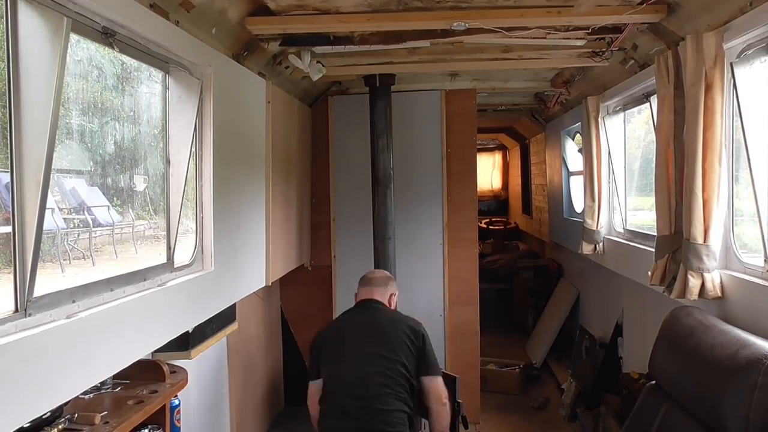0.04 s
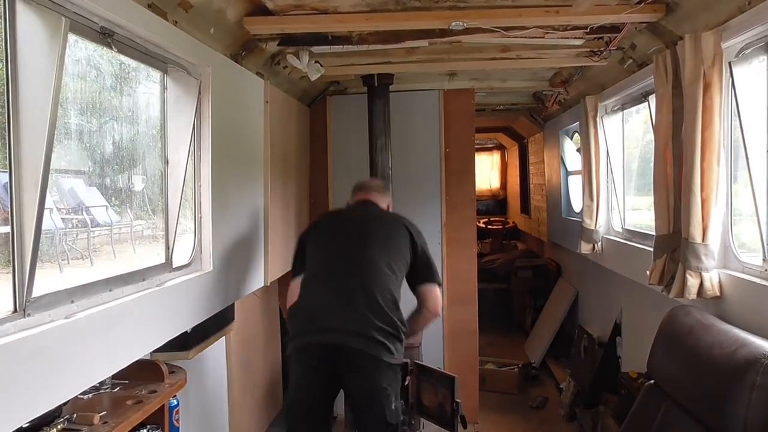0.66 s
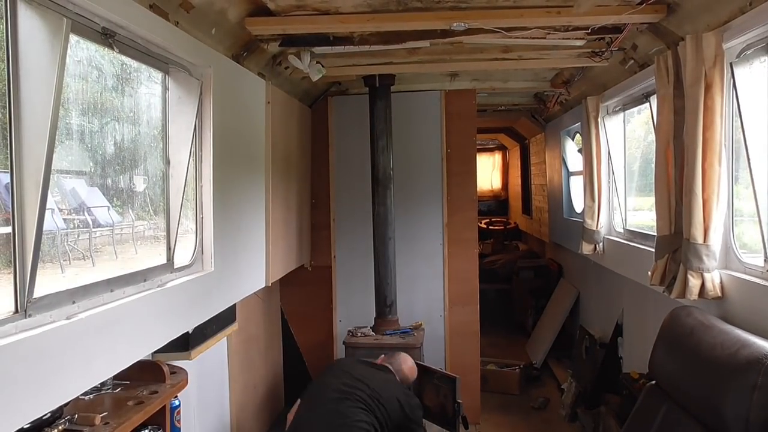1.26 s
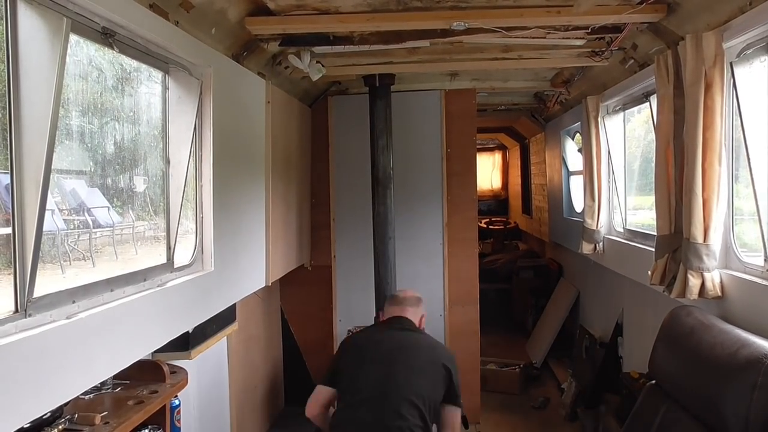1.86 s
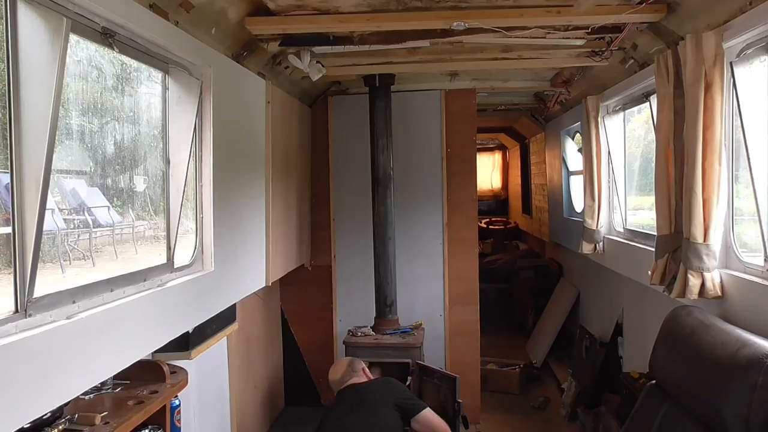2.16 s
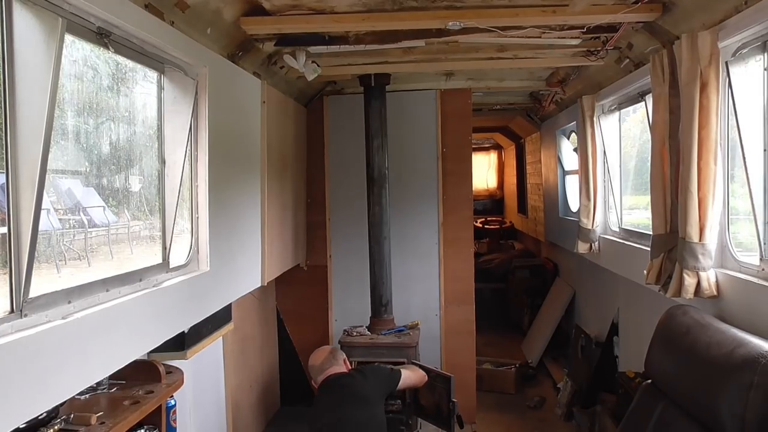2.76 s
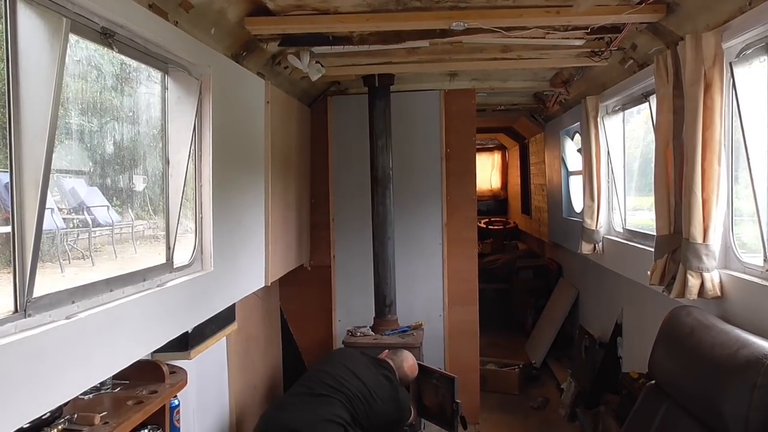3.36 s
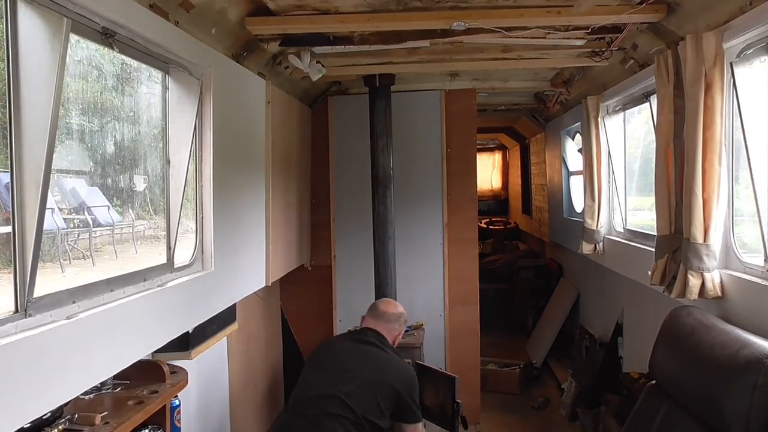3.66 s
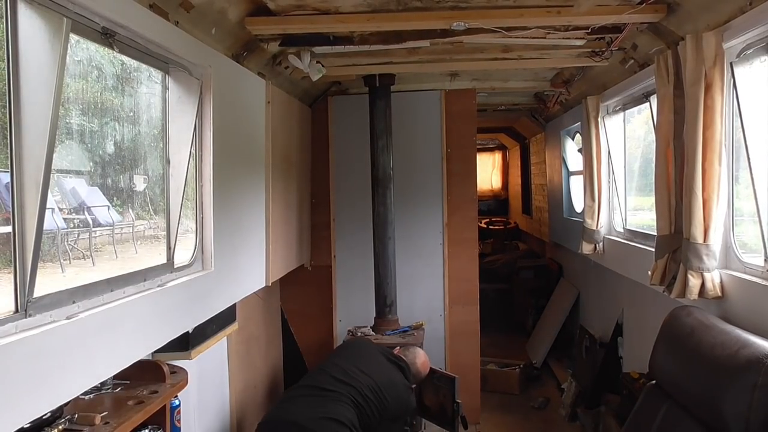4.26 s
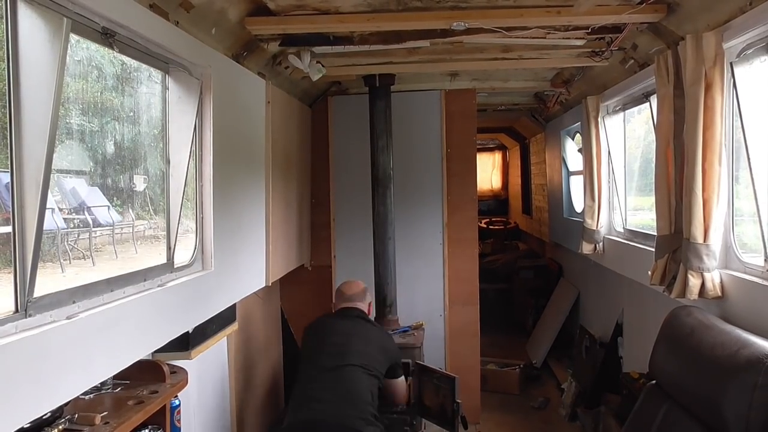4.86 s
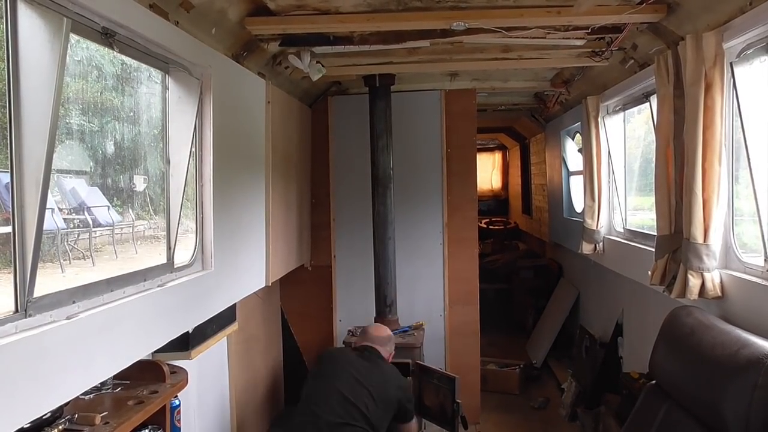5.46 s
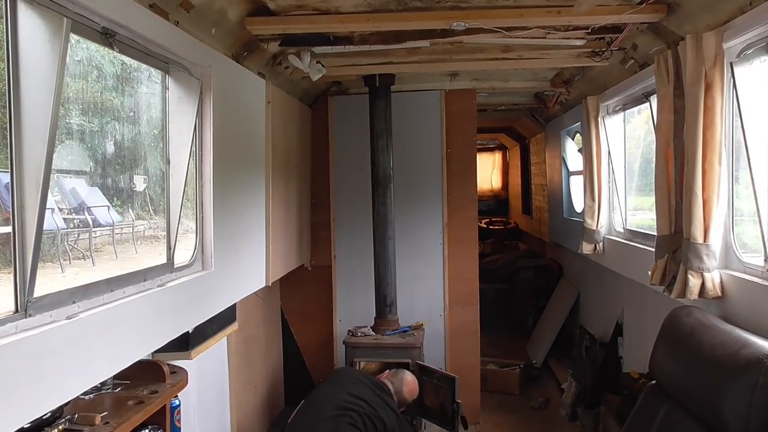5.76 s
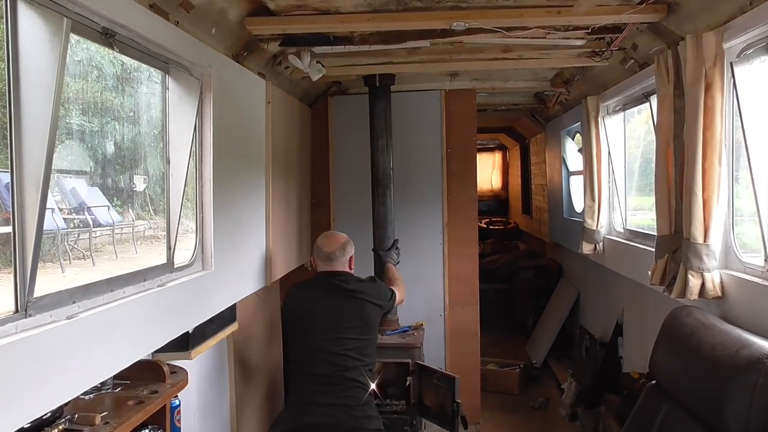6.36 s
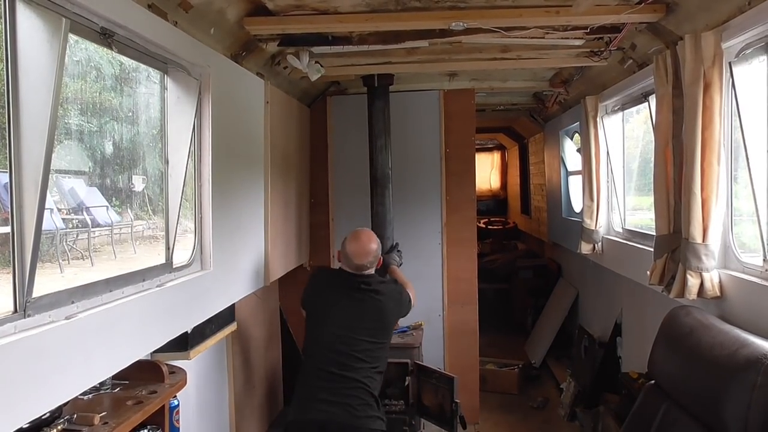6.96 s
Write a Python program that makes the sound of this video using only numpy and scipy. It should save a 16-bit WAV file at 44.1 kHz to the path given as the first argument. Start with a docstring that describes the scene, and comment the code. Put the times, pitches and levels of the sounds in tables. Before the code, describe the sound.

Quick, irregular metal clicks, tiny scrapes and high pings come from sped-up work on a stove, heard in close stereo in a boat cabin. Behind them are steady hiss and a faint, far engine whine, which rises just after a short hammer rattle. The hiss then cuts to a low hum at normal speed. Tools slide, and heavy knocks on the metal flue thump through the cabin and ring.

```python
"""Inside a wooden boat cabin, two close microphones on hand-tool work at an iron stove and its flue.
It opens in fast motion: cabin air hisses, a far engine whines thinly, and knocks, scrapes and steps
shrink to bright clicks and pings. At 3.6 s a hammer rattles on the stove; at 4.2 s the engine revs
up, then sinks. Near 6 s the pace drops to normal: a low hum, tools sliding, and from 6.6 s heavy
knocks that thump through the cabin and set the flue ringing."""
import sys
import numpy as np
from scipy import signal
from scipy.fft import rfft, irfft, next_fast_len
from scipy.io import wavfile
from scipy.ndimage import uniform_filter1d

SR = 44100
rng = np.random.default_rng(int(sys.argv[2]) if len(sys.argv) > 2 else 0)


def to_wav(sig):
    """Store sig (one row per channel, or 1-D mono) as 16-bit WAV at the path in sys.argv[1].

    Samples outside -1..1 are clipped; the rate is SR.
    """
    pcm = np.clip(np.atleast_2d(sig), -1, 1) * 32767
    pcm = np.round(pcm).astype(np.int16)
    wavfile.write(sys.argv[1], SR, pcm.T)  # frames by channels


N = 313595
T = np.arange(N) / SR
FFT_SIZE = next_fast_len(N, True)

# likeness of the two microphones, in fast motion and at normal pace: f/Hz, correlation
LIKENESS_FAST = [(60, 0.77), (200, 0.76), (640, 0.66), (1410, 1), (3100, 0.96), (6820, 0.91), (10000, 0.69),
                 (15000, 0.75)]
LIKENESS_NORMAL = [(60, 0.94), (130, 0.96), (200, 0.9), (380, 0.66), (700, 0.22), (1290, 0.41),
                   (2380, 0.19), (4400, 0.13), (15000, .03)]
# cabin air in fast motion, before and after the engine comes up: f/Hz, relative density/dB
IDLE_AIR = [(24, -55), (40, -24), (140, -20.5), (337, -19), (412, -17), (479, -16), (542, -17.5),
            (790, -16), (1440, -10.5), (2210, -2.5), (3560, -11), (4800, -5.5), (7170, -12), (14500, -12.5),
            (16000, -22)]
REVVED_AIR = [(24, -54), (40, -23), (121, -29.5), (163, -26), (231, -23), (283, -28), (363, -22),
              (896, -20), (1480, -10), (2570, -3), (3560, -9.5), (5180, -3.5), (7540, -15), (8990, -13.5),
              (16000, -20)]
# loudness of that air: t/s, level/dB
AIR_LEVEL = [(0, -42.5), (1.2, -43.5), (1.7, -43.5), (2.5, -47.5), (3.4, -43), (4.1, -43.5), (4.25, -40.5),
             (5.3, -37.5), (5.9, -39)]
# steady tones in it: f/Hz, width/Hz, level/dB
AIR_TONES = [(1980, 31, -56), (2663, 25, -57.5), (3380, 70, -63.5), (4810, 100, -57), (6010, 90, -57.5)]
# the far engine's whine: t/s, level/dB
WHINE_LEVEL = [(0, -75), (.8, -65), (1.3, -49.5), (1.5, -60), (4.12, -54.5), (4.2, -37.5), (4.5, -45),
               (5.1, -51.5), (5.5, -48.5), (5.94, -51)]
# moments when it labours: t/s, lift/dB
ENGINE_LABOURS = [(0.832, 12), (1.614, 12), (2.05, 8)]
# a second, rising whine as it revs: t/s, f/Hz, level/dB
REV_COURSE = [(4.12, 1230, -56), (4.16, 1270, -43), (4.22, 1477, -45), (4.28, 1660, -46), (4.34, 1750, -59),
              (4.5, 1760, -68)]
# engine orders of each whine: multiple, gain/dB
WHINE_HARMONICS = [(1, -2), (2, -10), (3, -10)]
REV_HARMONICS = [(2, 1.5), (3, -7), (4, -3)]
# tool knocks in fast motion: t/s, length/s, clack level/dB, hull thud level/dB,
TOOL_KNOCKS = [(.13, 0.0035, -47, -46.5, 7.5, 9, None, None),
               (.173, 0.0018, -25, -42.5, -2.5, -8.5, 0.0094, None),
               (0.225, 0.0028, -34, -38, -3, -1, None, None),
               (0.2518, 0.0011, -25, -34.5, -6.5, -1, None, None),
               (0.281, 0.002, -34, -40.5, -6, 8.5, None, None),
               (0.36, 0.0017, -28.5, -43, -2.5, -8, None, None),
               (0.5215, 0.0021, -34, -42.5, -8, 8.5, .0105, None),
               (0.599, 0.0096, -39, -45, -13, -3, None, "poker"),
               (.7286, 0.0017, -27.5, -37, -6.5, 3.5, None, None),
               (.994, .0027, -29, -54, -1.5, -14, 0.0057, "poker"),
               (1.0924, 0.0092, -30, -42.5, -3, -5.5, None, None),
               (1.144, 0.0047, -26, -36, -9, -3, None, None),
               (1.1699, .0012, -23, -43, -2, -11, None, None),
               (1.2217, 0.0039, -30.5, -46.5, -4, -3, .008, None),
               (1.5647, 0.00078, -21.5, -44.5, -17, -16, None, None),
               (1.588, 0.0051, -26.5, -44, 1, -2.5, None, None),
               (1.786, .0016, -19, -38.5, 7, -8, None, None),
               (1.898, 0.0067, -26.5, -63, -4.5, -5, None, None),
               (2.1157, .0021, -34.5, -67, 0, 0, None, None),
               (2.146, 0.01, -32.5, -49, -18, -7, None, None),
               (2.2636, 0.0073, -33.5, -54, -7, -4, None, None),
               (2.3043, 0.0011, -24, -38, 0, 9.5, 0.012, "plate"),
               (2.3394, 0.0037, -32, -48, -5, 2, None, None),
               (2.3774, 0.00095, -21, -33.5, -.5, 5, None, "plate"),
               (2.3988, 0.0021, -22.5, -39, -5, 6.5, None, "plate"),
               (2.421, 0.0061, -32, -44, -1, 10.5, None, "plate"),
               (2.572, 0.0017, -19, -45.5, -11, 5, None, None),
               (2.6795, .0037, -32.5, -51, -25, 3.5, None, None),
               (2.8027, 0.0022, -29, -50, -12.5, -3, None, None),
               (2.843, 0.011, -29.5, -36.5, -6, 5, None, None),
               (3.0094, 0.0011, -30.5, -34.5, -6, 6, None, None),
               (3.1911, .004, -32.5, -42.5, -12, 2, .0085, "spanner"),
               (3.3065, .005, -36, -41.5, -14, -2, None, None),
               (3.316, .008, -37, -46, -8, 7, None, "pliers"),
               (3.501, .0018, -33.5, -49, -5, 5.5, .014, None),
               (3.7034, 0.0028, -18.5, -35, -5, 1, None, None),
               (3.7545, 0.00081, -31, -39.5, 0, 4.5, None, None),
               (3.771, 0.0012, -26, -40, -2, 3.5, 0.0065, None),
               (3.812, .004, -25, -45, -2, -12, None, None), (3.832, .002, -21, -33, 7, 4.5, None, None),
               (3.84, 0.003, -20, -42, 1, -2.5, .0045, None),
               (3.873, 0.0034, -26, -41, -22, 7.5, None, None),
               (4.0078, .0021, -24.5, -47, -20, -1, None, None),
               (4.0955, 0.0017, -18.5, -43.5, -7, -21.5, 0.013, "flue"),
               (4.2958, 0.0022, -25.5, -52, -2.5, -14, None, "flue"),
               (4.329, 0.0018, -26, -39, -8, 14.5, None, "flue"),
               (4.3604, 0.004, -27, -38, 7, 1.5, None, "bar"),
               (4.429, 0.0032, -13, -37.5, -1.5, -15, .0047, None),
               (4.439, 0.0021, -18, -37, -16, 3.5, None, None),
               (4.6273, .0012, -29.5, -43, -5, 2, None, None),
               (4.694, .0031, -36.5, -41, 1.5, -4, None, None),
               (4.808, .0033, -17.5, -40.5, -7, -16, None, "flue"),
               (5.0032, 0.004, -15.5, -37, -5.5, -12.5, None, "flue"),
               (5.073, 0.0014, -28.5, -33.5, -7.5, 3.5, None, None),
               (5.222, 0.0081, -19.5, -36.5, -5.5, -8.5, None, "flue"),
               (5.4866, 0.00087, -27, -37, -2.5, -7.5, 0.0073, "flue"),
               (5.5808, 0.0031, -28, -33.5, -3.5, -3, .006, None),
               (5.814, .0031, -33, -47.5, 2.5, 2.5, None, None),
               (5.862, 0.0053, -27.5, -46, -4.5, -19, None, None)]
# stove and cabin resonances in each clack: f/Hz, width/Hz, gain/dB
CLACK_MODES = [(3300, 210, 2), (4265, 195, 1), (4625, 117, 5.5), (5130, 2800, 2.5), (6510, 450, -1),
               (7650, 680, -11.5), (8360, 450, -10)]
# scrapes in fast motion: t/s, length/s, level/dB, centre f/Hz
FAST_SCRAPES = [(.17, 0.054, -40, 4500), (.52, 0.015, -37, 10000), (.595, 0.041, -43, 13000),
                (.995, 0.051, -42, 6000), (1.09, 0.1, -44, 5000), (1.28, 0.049, -39.5, 8000),
                (2.31, 0.026, -30.5, 9600), (2.378, 0.056, -33, 10500), (2.835, 0.11, -37.5, 8000),
                (3.035, 0.047, -41.5, 12000), (3.19, 0.058, -39, 13000), (3.305, 0.027, -45, 12900),
                (3.81, 0.048, -21, 6800), (4.15, 0.049, -34.5, 7000), (4.48, 0.059, -37, 8000),
                (4.925, 0.036, -35.5, 11000), (5.48, 0.059, -35.5, 10000), (5.84, 0.037, -40, 8050)]
# spells of rummaging: t/s, length/s, clack level/dB, hardness/dB
RUMMAGE_SPELLS = [(.284, .03, -39.5, 3), (0.972, .06, -40, -8), (1.185, .012, -39, 1),
                  (1.325, .012, -37, -6), (1.543, .011, -39.5, -6), (1.77, .011, -34, -7),
                  (2.361, .045, -29.5, 4.5), (2.872, .036, -29.5, -10), (3.036, .011, -38.5, -3),
                  (3.723, .011, -31, 0), (3.821, .009, -31, -7), (4.169, .05, -39.5, 4),
                  (4.484, .035, -35, -3.5), (5.448, .055, -35, -5)]
# modes of the flue, four loose tools, the stove and its plate in fast motion: f/Hz, gain/dB, t60/s
METAL_MODES = {"flue": [(11410, -31, 0.24), (11970, -11.5, 0.14), (12840, -21, .15), (13150, 1, 0.074),
               (14500, -10, .11), (15570, -19, 0.11)], "bar": [(5420, -2.5, 0.21), (6110, -5.5, 0.12),
               (7580, -10, 0.14), (14860, -13, 0.24)], "spanner": [(5660, -11, .06), (6600, -6, .1),
               (11250, -1, .17), (11370, -2, .15), (12340, -7, .14), (13310, 0, .13), (13520, -1, .08)],
               "pliers": [(6580, -3.5, .1), (13200, 3, .06), (13380, 3, .08), (13600, 1, .13)],
               "poker": [(2950, -5, .1), (6040, -1.5, 0.13), (5600, -3.5, 0.11)],
               "plate": [(2300, -7, 0.091), (2476, 1, 0.056), (4722, -23, 0.041)],
               "stove": [(1727, 5.5, 0.027), (2370, -5.5, 0.038), (2487, 2, 0.034), (4730, -2, .055)]}
# each metal's ring against the knock that strikes it: gain/dB
METAL_GAIN = {"flue": -6.5, "bar": 4, "spanner": 2.5, "pliers": 3.5, "poker": -1, "plate": 1, "stove": -1}
# feet and knees on the floor: t/s, length/s, boom level/dB, boom f/Hz
FOOTFALLS = [(.753, 0.0074, -27, 1990), (.8674, 0.0046, -32.5, 1870), (1.065, 0.0033, -24.5, 1930),
             (1.1187, 0.0041, -24, 1820), (1.27, 0.0097, -28, 1780), (1.303, 0.0043, -22.5, 1850),
             (2.55, 0.0023, -27, 1910), (2.559, 0.0015, -22.5, 1890), (2.623, 0.0015, -34, 1810),
             (2.7816, 0.01, -29, 1830), (2.7901, 0.0033, -23, 1890), (3.539, .003, -27, 2020),
             (3.9112, 0.0057, -22.5, 1870), (4.186, 0.0021, -23, 1920), (4.192, 0.0044, -21.5, 1840),
             (4.4814, 0.0019, -21.5, 1880), (5.4657, 0.0018, -26.5, 1800)]
# the hammer run peaks early, then grows duller and heavier: t/s, clack level/dB, thud level/dB
HAMMER_LEVELS = [(3.574, -20, -38), (3.595, -15.5, -30), (3.65, -21, -30.5), (3.688, -22, -26.5)]
# room tone at normal pace: f/Hz, relative density/dB
ROOM_SPECTRUM = [(25, -37), (50, -20), (80, -5), (140, -8.5), (190, -10.5), (260, -5), (384, -18.5),
                 (714, -25), (880, -24.5), (1200, -28.5), (1800, -39.5), (4300, -41), (6500, -46.5),
                 (11000, -45.5), (16000, -53)]
# steady tones in it: f/Hz, width/Hz, level/dB
ROOM_TONES = [(81.3, 7.7, -68), (258, 15, -48), (2350, 35, -65.5)]
# tools sliding at normal pace: t/s, length/s, level/dB, centre f/Hz
TOOL_SLIDES = [(5.953, 0.039, -42.5, 640), (6.26, 0.041, -37, 530), (6.262, 0.036, -45.5, 1840),
               (6.265, 0.039, -42.5, 3700), (6.265, 0.04, -40, 7200), (6.29, 0.097, -57, 4900),
               (6.443, .05, -54.5, 7350), (6.593, 0.053, -48, 6740), (6.675, 0.066, -48.5, 7900),
               (6.79, 0.043, -48, 5530), (7.025, 0.096, -51, 8440)]
# heavy knocks on the flue: t/s, decay/s, then level/dB of thump, body, clank and edge
FLUE_BLOWS = [(6.624, 0.01, -17.5, -16, -19.5, -30), (6.691, 0.0079, -15, -12.5, -16.5, -34),
              (6.711, 0.0092, -19.5, -20, -24, -37.5), (6.812, 0.0086, -17.5, -17, -25.5, -32.5),
              (6.866, 0.0065, -30, -26, -37.5, -55), (6.932, 0.0051, -19.5, -13, -19.5, -37),
              (7.05, 0.009, -19, -19, -21, -29.5)]
# the cabin's low boom, then the flue's modes: f/Hz, gain/dB, t60/s
FLUE_MODES = [(96.5, 4, 0.12), (587, -13, 0.47), (669, -19, 1), (805, 2.5, 0.19), (1048, -8, 0.13),
              (1680, -12, 0.19), (1840, -25, 0.27), (1880, -6.5, 0.074), (2026, -5, 0.076),
              (2150, -27, 0.16)]
# rings of the flue: t/s, level/dB, f/Hz favoured by the spot struck, its lift/dB
FLUE_RINGS = [(6.624, -24.5, 2020, 8), (6.692, -36, 100, 16), (6.812, -23, 810, 1), (6.932, -26, 590, 15),
              (7.05, -21, 667, 23)]


def gain(db):
    """Decibels to amplitude."""
    return 10 ** (np.asarray(db) / 20)


def unit_rms(x):
    """Scales a signal to unit rms."""
    return x / np.sqrt(np.mean(x ** 2) + 1e-20)


def wobble(shape, span):
    """Random motion of unit rms, smoothed over span samples."""
    return unit_rms(uniform_filter1d(rng.standard_normal(shape), span))


def value_at(points, hz):
    """Reads rows of f/Hz, value on a log-frequency axis."""
    f, value = np.transpose(points)
    return np.interp(np.log(hz + 1), np.log(f + 1), value)


def add(mix, start_s, sound):
    """Mixes a sound in at start_s."""
    part = mix[:, max(round(start_s * SR), 0):][:, :sound.shape[-1]]
    part += sound[..., :part.shape[1]]


def bins(size):
    """Frequencies of a spectrum of size samples."""
    return np.fft.rfftfreq(size, 1 / SR)


def resonance(f, hz, width):
    """Complex response of one damped mode, gain 1 at its centre."""
    return 1j * f * width / (hz ** 2 - f ** 2 + 1j * f * width)


def band(f, lo_hz, hi_hz, order=3):
    """Complex response of a causal, flat-topped band-pass."""
    s = 1j * (f ** 2 - lo_hz * hi_hz) / ((f + 1e-3) * (hi_hz - lo_hz))
    return 1 / np.prod([s - pole for pole in signal.buttap(order)[1]], axis=0)


def pair_noise(size, likeness):
    """White noise at two close microphones, partly alike."""
    mid, side = rfft(rng.standard_normal((2, size)))
    same = np.clip(value_at(likeness, bins(size)), 0, .999)
    mid, side = mid * np.sqrt((1 + same) / 2), side * np.sqrt((1 - same) / 2)
    return irfft(np.array([mid + side, mid - side]), size)


def steady_noise(response, likeness):
    """Lasting noise at the pair with the given response."""
    return irfft(rfft(pair_noise(FFT_SIZE, likeness)) * response, FFT_SIZE)[:, :N]


def air(spectrum, likeness):
    """Steady noise of unit rms with the given spectrum."""
    return unit_rms(steady_noise(gain(value_at(spectrum, bins(FFT_SIZE))), likeness))


def tones(rows, likeness):
    """Narrow bands of noise, heard as wavering tones."""
    f = bins(FFT_SIZE)
    peaks = sum(gain(db) / (1 + (2 * (f - hz) / width) ** 2) * np.sqrt(SR / 2 / width)
                for hz, width, db in rows)
    return steady_noise(peaks, likeness)


def through(burst, paths, hold_s):
    """Sends a burst down (response, level/dB) paths, each with the energy of its level over hold_s."""
    spectrum = rfft(burst)
    filtered = [(spectrum * response, db) for response, db in paths]
    mixed = sum(gain(db) * y / np.sqrt(np.mean(abs(y) ** 2) + 1e-20) for y, db in filtered)
    return irfft(mixed) * np.sqrt(hold_s * SR)


def ring(modes, likeness, rise_s):
    """Dying sines; the cabin's standing waves put them out of phase between the microphones."""
    t = np.arange(SR // 2) / SR
    out = np.zeros((2, len(t)))
    for hz, db, t60 in modes:
        apart = np.arccos(np.clip(value_at(likeness, hz), 0, 1)) * np.array([[.5], [-.5]])
        out += gain(db - 60 * t / t60) * np.sin(2 * np.pi * (hz * t + rng.random()) + apart)
    return out * (1 - np.exp(-t / rise_s))


def cabin_hiss():
    """Cabin air in fast motion; its colour shifts as the far engine comes up."""
    revved = np.interp(T, [4.1, 4.3], [0, 1])
    hiss = np.sqrt(1 - revved) * air(IDLE_AIR, LIKENESS_FAST)
    hiss += np.sqrt(revved) * air(REVVED_AIR, LIKENESS_FAST)
    return hiss * gain(np.interp(T, *np.transpose(AIR_LEVEL))) + tones(AIR_TONES, LIKENESS_FAST)


def whine(times, hz, db, orders, waver=.0042, flutter_db=4.5):
    """A wavering stack of engine orders on a pitch curve, centred between the microphones."""
    drift, flutter = wobble((2, N), 400)
    phase = 2 * np.pi * np.cumsum(np.interp(T, times, hz) * (1 + waver * drift)) / SR
    sounding = (T >= times[0]) & (T <= times[-1])
    level = gain(np.interp(T, times, db) + flutter_db * flutter) * sounding
    return level * sum(gain(order_db) * np.sin(order * phase) for order, order_db in orders)


def far_engine(idle_hz=1479, peak_hz=2017, settled_hz=1379, peak_s=4.2, rise_s=.08, sink_s=.57,
               labour_s=.04, sag_hz=144):
    """A distant engine idles, dips lower and louder as it labours, revs up once and sinks back."""
    sinking_hz = settled_hz + (peak_hz - settled_hz) * np.exp(-np.maximum(T - peak_s, 0) / sink_s)
    hz = idle_hz + (sinking_hz - idle_hz) * np.clip(1 + (T - peak_s) / rise_s, 0, 1)
    db = np.interp(T, *np.transpose(WHINE_LEVEL))
    for at, lift_db in ENGINE_LABOURS:
        load = np.exp(-((T - at) / labour_s) ** 2)
        hz, db = hz - sag_hz * load, db + lift_db * load
    return whine(T, hz, db, WHINE_HARMONICS) + whine(*np.transpose(REV_COURSE), REV_HARMONICS)


def faint_touches(per_s=60, level_db=-49, spread_db=3.5, decay_s=.0012):
    """Hands and tools brush things at random, each touch a tiny burst of noise."""
    strengths = gain(spread_db * np.minimum(rng.exponential(1, FFT_SIZE), 2))
    touches = strengths * (rng.random(FFT_SIZE) < per_s / SR)
    envelope = signal.lfilter([1], [1, -np.exp(-1 / (decay_s * SR))], touches)
    spectrum = [(30, -4), (600, -10), (1200, -7), (1900, 3), (3500, -2.5), (15000, -9)]  # f/Hz, gain/dB
    colour = gain(value_at(spectrum, bins(FFT_SIZE)))
    bursts = pair_noise(FFT_SIZE, LIKENESS_FAST) * envelope
    return gain(level_db) * unit_rms(irfft(rfft(bursts) * colour, FFT_SIZE)[:, :N])


def knocks(contacts, size=2048, rise_s=.00029, echo_db=-24, echo_s=.0089, half_width_hz=240):
    """Each contact and its cabin echo drive a hull thud, floor boom, stove clack and bright tick."""
    f, t, out = bins(size), np.arange(size) / SR, np.zeros((2, N))
    thud = band(f, 34, 1900, order=1) * band(f, 8.5, 1670, order=2)
    body = sum(gain(db) * resonance(f, hz, width) for hz, width, db in CLACK_MODES)
    clack = band(f, 2340, 8620, order=4) * body
    tick = band(f, 9060, 18600)
    broad_boom = gain(-9) * band(f, 1510, 2655, order=4)
    echo = gain(echo_db) * np.exp(-t / echo_s)
    for at, length, boom_hz, thud_db, boom_db, clack_db, tick_db in contacts:
        envelope = (1 - np.exp(-t / rise_s)) * (np.exp(-(t / length) ** 1.05) + echo)
        boom = band(f, boom_hz - half_width_hz, boom_hz + half_width_hz, order=4) + broad_boom
        tilt = np.clip((tick_db - clack_db + 4.5) / 12, -.2, .7)  # a harder contact clacks brighter
        tilted_clack = clack * (f / 5000 + .01) ** tilt
        paths = (thud, thud_db), (boom, boom_db), (tilted_clack, clack_db), (tick, tick_db)
        add(out, at - .0003, through(pair_noise(size, LIKENESS_FAST) * envelope, paths, hold_s=.0048))
    return out


def contact(at, length, clack_db, thud_db, weight_db, hard_db):
    """One row for knocks(): a light, hard contact booms higher than a heavy one."""
    boom_hz = 2040 + 10 * hard_db - 17.5 * weight_db
    return at, length, boom_hz, thud_db, clack_db + weight_db, clack_db, clack_db + hard_db


def tool_contacts(rebound_db=-4.5):
    """Tools strike; some bounce and land again more weakly."""
    for at, length, db, thud_db, weight_db, hard_db, delay, _ in TOOL_KNOCKS:
        yield contact(at, length, db, thud_db, weight_db, hard_db)
        if delay:
            yield contact(at + delay, length, db + rebound_db, thud_db + rebound_db, weight_db, hard_db)


def scrapes(rows, likeness, grain_db, grain_s, band_ratio, size=8192):
    """Metal slides on metal: noise that catches and slips in grains."""
    t, out = np.arange(size) / SR, np.zeros((2, N))
    for at, length, db, hz in rows:
        grains = gain(grain_db * wobble(size, int(grain_s * SR)))
        stroke = np.sin(np.pi * np.minimum(t / length, 1))
        friction = pair_noise(size, likeness) * grains * stroke
        colour = band(bins(size), hz / band_ratio, hz * band_ratio, order=2)
        add(out, at, through(friction, [(colour, db)], hold_s=length))
    return out


def rummaging(count=24, gap_s=.012, spread_db=2.5):
    """Small contacts of uneven timing and strength through each spell."""
    for start, length, db, hard_db in RUMMAGE_SPELLS:
        times = start + gap_s * (np.arange(count) + .5 * rng.random(count))
        scatter = spread_db * rng.standard_normal((count, 3))
        for at, (louder, heavier, harder) in zip(times[times < start + length], scatter):
            yield contact(at, length=.0046, clack_db=db + louder, thud_db=db - 14.5,
                          weight_db=heavier - 2.5, hard_db=hard_db + harder)


def metal_pings(flutter_db=3):
    """Flue, stove, plate or loose tool rings on after a knock; cabin echoes make the ring flutter."""
    out = np.zeros((2, N))
    struck = [(at, db, metal) for at, _, db, *_, metal in TOOL_KNOCKS if metal]
    for at, db, _, flue_db in hammer_run():
        struck += [(at, db, "stove"), (at, flue_db, "flue")]
    for at, db, metal in struck:
        ping = ring(METAL_MODES[metal], LIKENESS_FAST, rise_s=.0004)
        add(out, at + .0011, gain(db + METAL_GAIN[metal]) * ping)
    return out * gain(flutter_db * wobble(N, 300))


def footfalls():
    """Feet and knees land on the wooden floor: contacts that are nearly all boom."""
    for at, length, boom_db, boom_hz in FOOTFALLS:
        thud_db, clack_db, tick_db = boom_db - 22, boom_db - 7.5, boom_db - 15
        yield at, length, boom_hz, thud_db, boom_db, clack_db, tick_db


def hammer_run(start_s=3.5737, gap_s=.0189, count=7, first_flue_db=-26, last_flue_db=-17):
    """Even blows that shake the flue ever harder: t/s, then level/dB of clack, thud and flue drive."""
    times = start_s + gap_s * np.arange(count)
    at, clack_db, thud_db = np.transpose(HAMMER_LEVELS)
    flue_db = np.linspace(first_flue_db, last_flue_db, count)
    return zip(times, np.interp(times, at, clack_db), np.interp(times, at, thud_db), flue_db)


def hammer_contacts(length_s=.0025, boom_hz=2130, boom_db=-21.5, hard_db=-.5):
    """The hammer meets the iron stove in short, hard contacts."""
    for at, clack_db, thud_db, _ in hammer_run():
        yield at, length_s, boom_hz, thud_db, boom_db, clack_db, clack_db + hard_db


def cabin_hum(level_db=-38.5):
    """Room tone at normal pace: low noise with three wavering tones."""
    return gain(level_db) * air(ROOM_SPECTRUM, LIKENESS_NORMAL) + tones(ROOM_TONES, LIKENESS_NORMAL)


def flue_blows(size=16384, lead_s=.04, swell_s=.0068, echo_db=-29, echo_s=.02):
    """Heavy knocks on the flue swell in over some milliseconds and thump through the cabin."""
    f, t, out = bins(size), np.arange(size) / SR - lead_s, np.zeros((2, N))
    thump, body = band(f, 76, 143), band(f, 182, 395)
    clank = band(f, 570, 970) + gain(4) * band(f, 480, 1155)
    edge_modes = gain(-.5) * resonance(f, 3450, 420) + gain(-14.5) * resonance(f, 4360, 900)
    edge = (band(f, 1820, 2540, order=2) + edge_modes) * band(f, 1070, 5300, order=2)
    swell, since_peak = np.exp(np.minimum(t, 0) / swell_s), np.maximum(t, 0)
    echo = gain(echo_db) * np.exp(-since_peak / echo_s)
    for at, decay_s, *levels in FLUE_BLOWS:
        burst = pair_noise(size, LIKENESS_NORMAL) * swell * (np.exp(-since_peak / decay_s) + echo)
        paths = zip((thump, body, clank, edge), levels)
        add(out, at - lead_s - .002, through(burst, paths, hold_s=.02))
    return out


def flue_ringing(spot_width=.051):
    """The flue rings on, favouring a pitch set by the spot struck, until the tool lands and damps it."""
    t, out = np.arange(SR // 2) / SR, np.zeros((2, N))
    for at, level_db, spot_hz, lift_db in FLUE_RINGS:
        modes = [(hz, db + lift_db * np.exp(-(np.log(hz / spot_hz) / spot_width) ** 2), t60)
                 for hz, db, t60 in FLUE_MODES]
        next_touch = min((later for later, *_ in FLUE_RINGS if later > at), default=at + 1)
        damping = np.interp(at + t, [next_touch - .02, next_touch], [1, 0])
        add(out, at, gain(level_db) * ring(modes, LIKENESS_NORMAL, rise_s=.0012) * damping)
    return out


def scene(pace_drop_s=5.937, gap_s=.014):
    """The work in fast motion, a brief gap, then the same cabin at normal pace."""
    fast = cabin_hiss() + far_engine() + faint_touches()
    fast += knocks([*tool_contacts(), *rummaging(), *footfalls(), *hammer_contacts()])
    fast += scrapes(FAST_SCRAPES, LIKENESS_FAST, grain_db=6.5, grain_s=.0026, band_ratio=3)
    fast += metal_pings()
    normal = cabin_hum()
    normal += scrapes(TOOL_SLIDES, LIKENESS_NORMAL, grain_db=1, grain_s=.003, band_ratio=1.26)
    normal += flue_blows() + flue_ringing()
    fade_out = np.clip((pace_drop_s - T) / .002 + 1, 0, 1)
    fade_in = np.clip((T - pace_drop_s - gap_s) / .004 + .5, 0, 1)
    return fast * fade_out + normal * fade_in


def record(dry):
    """Both microphone channels stop at full scale, then pass a steep low-pass."""
    low_pass = signal.firwin(401, cutoff=15950, window=("kaiser", 8), fs=SR)
    return signal.oaconvolve(np.clip(dry, -1, 1), low_pass[None], "same")


dry = scene()
out = record(dry)
to_wav(out)
```